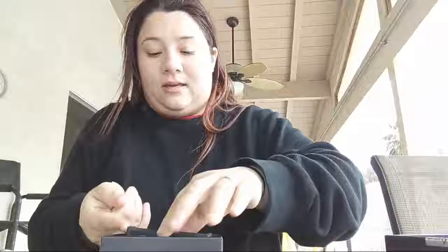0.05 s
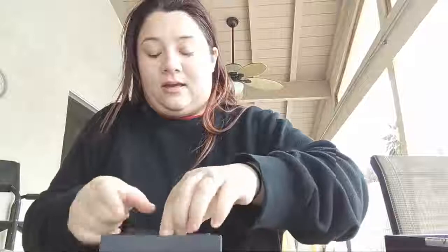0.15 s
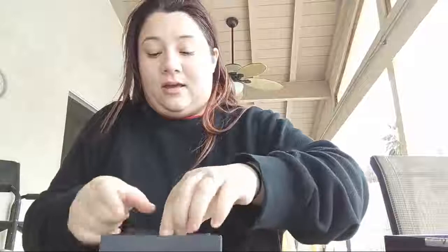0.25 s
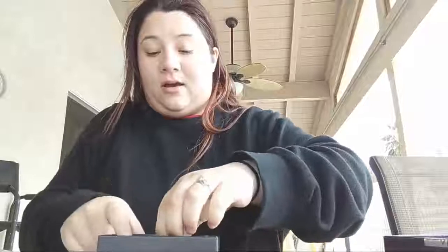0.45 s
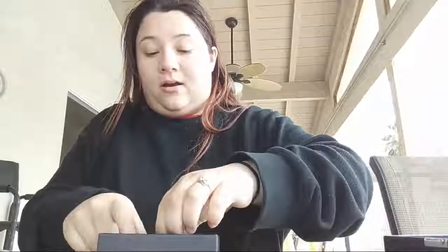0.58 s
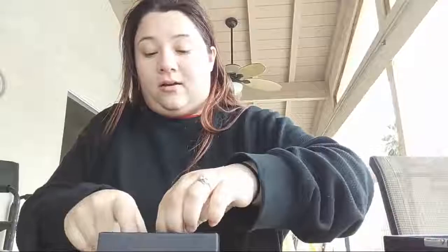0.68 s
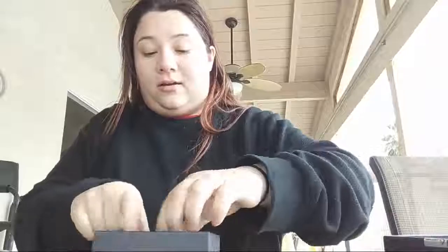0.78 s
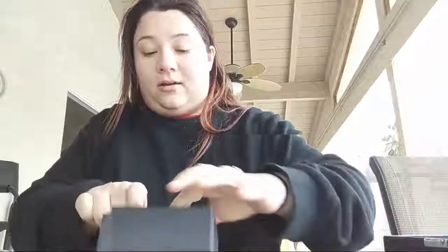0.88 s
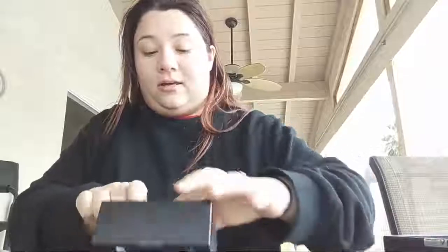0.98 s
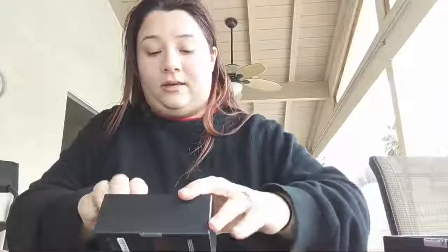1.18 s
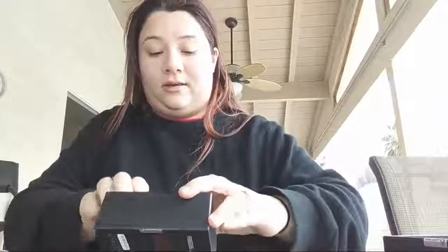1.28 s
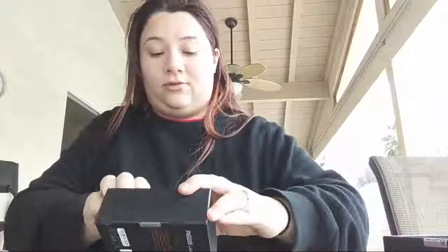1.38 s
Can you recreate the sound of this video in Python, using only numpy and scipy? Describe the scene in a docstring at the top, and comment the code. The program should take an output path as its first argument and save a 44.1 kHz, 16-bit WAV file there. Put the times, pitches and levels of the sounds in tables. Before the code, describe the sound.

Small stiff box handled by fingers, close up: a bright snap and cluster of ticks early, a near-quiet gap with one faint bird chirp, then light knocks and scraping over steady distant wash and hiss.

```python
"""A far traffic-like wash with microphone hiss comes first: band-shaped noise, steady throughout.
Fingers then work at the lid of a small cardboard box on a patio table, close to a laptop-style microphone.
A nail snaps off the lid edge and the lid rattles back; later the box is knocked, slid and lifted.
Contacts are short pushes into ringing modes; rubbing is random grains, sliding is resonant noise.
Dry nail ticks are noise bursts; one faint bird chirp is a rising sine."""
import sys
import numpy as np
from scipy import signal
from scipy.io import wavfile

SR = 44100
rng = np.random.default_rng(int(sys.argv[2]) if len(sys.argv) > 2 else 0)


def elevation(decibels):
    """Turn decibel levels (scalar or array-like) into linear amplitude ratios."""
    levels = np.asarray(decibels, float)
    return 10 ** (levels / 20)


def wav_record(signal):
    """Record a signal, one row per channel, as 16-bit PCM in the file named by sys.argv[1]."""
    frames = np.transpose(np.atleast_2d(signal))
    bounded = np.clip(frames, -1, 1)
    # unit amplitude maps onto the largest positive 16-bit level
    quanta = np.round(bounded * 32767).astype(np.int16)
    wavfile.write(sys.argv[1], SR, quanta)


N = 63945

# light nail and finger contacts on the box: (time [s], level before the modes [dB], contact length [ms])
LIGHT_TAPS = [(0.1665, -53, .6), (0.1833, -51, .16), (0.2450, -44, .5), (0.2585, -38, .4),
              (0.2622, -32, .35), (0.2665, -39, .6), (0.2712, -37, .6), (0.2840, -35, .1),
              (0.2886, -36, .45), (0.2920, -40, .3), (0.3200, -46, .3), (0.3228, -40, 1.1),
              (0.3258, -43, 1.1), (0.3289, -38, 1.5), (0.3430, -48, .6), (0.3555, -49, .2),
              (0.9135, -44, .3), (0.9158, -38.5, .16), (0.9179, -33, 1.3), (0.9640, -41, 2.0),
              (0.9705, -46, .4), (1.1830, -47, .5), (1.4240, -53, .5)]
# box and table modes: (frequency [Hz], relative level [dB], t60 [s])
BOX_MODES = [(119, -32, 0.23), (389, -19, 0.032), (254, -28, .3), (606, -5, .033), (696, -1, .025),
             (991, -6, .013), (1219, -3, .020), (1880, -5, .008), (2045, -19, 0.024), (3230, -3.5, 0.0054),
             (3910, -0.5, 0.0063), (5140, -6.5, 0.013), (5800, -26, 0.0053), (6585, 6, 0.012),
             (7100, -4.5, 0.021), (8600, -26, .006), (10600, -29, .006)]
# dry nail ticks that miss the box body: (time [s], level before the high-pass [dB])
NAIL_TICKS = [(0.1830, -60), (0.2490, -50), (0.9160, -56), (0.2975, -58), (0.3000, -52)]
# fingers and box rubbing: (time [s], level [dB], tilt about 1 kHz [dB/octave])
RUB_STROKES = [(0, -78.5, 5.3), (0.238, -57.5, -0.1), (0.253, -40, -0.5), (0.273, -48, 1), (0.30, -51.5, 2),
               (0.311, -42, -3), (0.335, -53.5, -1), (0.37, -63.5, 0.7), (0.6, -100, -11.7),
               (0.8, -65, 2.2), (0.871, -58, -3.5), (0.907, -55.5, 4), (0.928, -51, 0.3),
               (0.982, -58, -0.5), (1.032, -53.5, 0.1), (1.07, -54, -1.3), (1.12, -59.5, -3.3),
               (1.18, -62, -0.7), (1.25, -56.5, -2.3), (1.33, -66, -0.5), (1.425, -84, -9.5),
               (1.44, -52, 2), (1.45, -73, 8.5)]
# cardboard colour of the rub: (frequency [Hz], relative band level [dB])
CARDBOARD_COLOUR = [(30, -48), (90, -28.5), (150, -21), (255, -4.5), (420, -7), (700, 1.5), (1200, -1.5),
                    (1500, -9), (2300, -10), (3000, -12.5), (4000, -15), (5500, -24), (6500, -24.5),
                    (8000, -27), (11000, -29.5), (16000, -44)]
# skin and nail sliding along the smooth lid: (time [s], level [dB])
SLIDE_LEVEL = [(0, -85), (0.95, -80), (0.99, -67), (1.03, -61), (1.08, -63), (1.12, -67), (1.17, -69),
               (1.24, -67), (1.29, -76), (1.41, -80), (1.428, -66), (1.434, -68), (1.442, -59), (1.45, -56)]
# panel resonances sung by the slide: (frequency [Hz], bandwidth [Hz], relative level [dB])
SLIDE_RESONANCES = [(2150, 300, -1), (2600, 350, -2), (3950, 450, -7), (6400, 500, -15), (8300, 600, -21)]
# bird chirp: (start [s], length [s], from [Hz], to [Hz], peak level [dB])
BIRD_CHIRP = (0.540, .046, 3250, 3900, -72)
# colour of the steady background: (frequency [Hz], relative band level [dB])
WASH_COLOUR = [(25, -41), (60, -21.5), (120, -15.5), (200, -8.5), (250, -2), (320, -5), (480, -4.5),
               (600, -1.5), (800, -1.5), (1150, -2.5), (1400, -13.5), (2000, -14.5), (2600, -18),
               (3700, -18), (5000, -25.5), (6300, -30), (7800, -33), (10000, -29.5), (16000, -30.5)]


def rms_one(x):
    """Scale to rms 1."""
    return x / np.sqrt(np.mean(x ** 2) + 1e-20)


def drift(rate_hz):
    """Slow random curve of rms 1: white noise through two equal one-pole low-passes."""
    pole = np.exp(-2 * np.pi * rate_hz / SR)
    noise = rng.standard_normal(N + SR)
    slow = signal.lfilter([1], [1, -2 * pole, pole * pole], noise)
    return rms_one(slow[SR:])  # first second settles the filter


def ring(force, hz, t60_s):
    """Damped resonator: a unit click sets a sine of height 1 ringing."""
    radius = elevation(-60 / (t60_s * SR))
    angle = 2 * np.pi * hz / SR
    feedback = [1, -2 * radius * np.cos(angle), radius * radius]
    return signal.lfilter([0, np.sin(angle)], feedback, force + 1e-18)


def colour_bands(sources, colour, patchy_db, tilt_db_per_octave=0):
    """Quarter-octave bands from two alternating sources, with level, tilt and one of five flickers."""
    colour_hz, colour_db = np.transpose(colour)
    edges_hz = 22 * 2 ** np.arange(0, 9.7, 0.25)
    flickers = [drift(15) for _ in range(5)]
    out = 0
    for k, (low_hz, high_hz) in enumerate(zip(edges_hz, edges_hz[1:])):
        mid_hz = np.sqrt(low_hz * high_hz)
        level_db = np.interp(np.log(mid_hz), np.log(colour_hz), colour_db)
        level_db = level_db + tilt_db_per_octave * np.log2(mid_hz / 1000)
        band_pass = signal.butter(2, [low_hz, high_hz], "band", fs=SR, output="sos")
        twice = np.tile(sources[k % 2], 2)
        band = signal.sosfilt(band_pass, twice)[N:]  # first pass settles the filter
        out = out + elevation(level_db + patchy_db * flickers[k % 5]) * band
    return out


def strike(time_s, level_db, contact_ms, spread_db):
    """Unit-area half-sine push of the contact's length into all box modes."""
    opposed_above_hz = 850  # higher modes start the other way
    phase = np.clip((np.arange(N) / SR - time_s) * 1000 / contact_ms, 0, 1)
    push = np.sin(np.pi * phase) * np.pi / 2 * 1000 / (contact_ms * SR)
    start = int(time_s * SR)
    force = push[start:start + SR // 2]
    out = np.zeros(N)
    for (hz, mode_db, t60_s), own_db in zip(BOX_MODES, spread_db):
        gain = np.sign(opposed_above_hz - hz) * elevation(level_db + mode_db + own_db)
        out[start:start + len(force)] += gain * ring(force, hz, t60_s)
    return out


def lid_snap():
    """The nail catches the lid edge, then lets go with the opposite push."""
    even = np.zeros(len(BOX_MODES))
    catch = strike(0.24888, -20, 0.25, even)
    release = strike(0.24920, -16.3, 0.44, even)
    return catch - release


def light_taps():
    """Light contacts, each with its own mode balance; they hardly reach the top modes."""
    spread_db, cut_hz = 3, 4300
    spread = spread_db * rng.standard_normal((len(LIGHT_TAPS), len(BOX_MODES)))
    contacts = sum(strike(*tap, own) for tap, own in zip(LIGHT_TAPS, spread))
    return signal.sosfilt(signal.butter(4, cut_hz, fs=SR, output="sos"), contacts)


def struck_box():
    """Snap and taps through a bass cut: a small box radiates little bass."""
    bass_cut_hz = 200
    high_pass = signal.butter(2, bass_cut_hz, "high", fs=SR, output="sos")
    return signal.sosfilt(high_pass, lid_snap() + light_taps())


def nail_ticks():
    """Tiny bright noise bursts with exponential decay, high-passed."""
    low_hz, decay_ms = 7100, 0.97
    t = np.arange(200) / SR
    decay = np.exp(-t * 1000 / decay_ms)
    noises = rng.standard_normal((len(NAIL_TICKS), len(t)))
    out = np.zeros(N)
    for (time_s, level_db), noise in zip(NAIL_TICKS, noises):
        out[int(time_s * SR):][:len(t)] += elevation(level_db) * noise * decay
    return signal.sosfilt(signal.butter(4, low_hz, "high", fs=SR, output="sos"), out)


def rub():
    """Dense uneven fibre slips coloured by the cardboard, juddering under the stroke."""
    grains_per_s, grain_db, judder_db = 7000, 2.5, 1.5
    time_s, level_db, tilt = np.transpose(RUB_STROKES)
    t = np.arange(N) / SR
    slips = (rng.random((2, N)) < grains_per_s / SR) * rng.choice([-1, 1], (2, N))
    unevenness = np.minimum(rng.exponential(1, (2, N)), 5)
    grains = slips * elevation(grain_db * unevenness)
    sound = colour_bands(grains / np.std(grains), CARDBOARD_COLOUR, 1.96, np.interp(t, time_s, tilt))
    stroke_db = np.interp(t, time_s, level_db) + judder_db * drift(60)
    return elevation(stroke_db) * rms_one(sound)


def slide():
    """Smooth friction noise singing in a few panel resonances, each wavering in level."""
    waver_db = 2.5
    noises = rng.standard_normal((len(SLIDE_RESONANCES), N))
    singing = 0
    for (hz, width_hz, level_db), noise in zip(SLIDE_RESONANCES, noises):
        t60_s = np.log(1000) / (np.pi * width_hz)
        gain = elevation(level_db + waver_db * drift(20))
        singing = singing + gain * rms_one(ring(noise, hz, t60_s))
    level = elevation(np.interp(np.arange(N) / SR, *np.transpose(SLIDE_LEVEL)))
    return level * rms_one(singing)


def bird():
    """One rising whistle: a gliding sine under a half-sine swell."""
    start_s, length_s, from_hz, to_hz, peak_db = BIRD_CHIRP
    progress = np.clip((np.arange(N) / SR - start_s) / length_s, 0, 1)
    pitch_hz = from_hz + (to_hz - from_hz) * progress ** 1.3
    whistle = np.sin(2 * np.pi * np.cumsum(pitch_hz) / SR)
    return elevation(peak_db) * np.sin(np.pi * progress) * whistle


def wash():
    """Far traffic-like wash and microphone hiss as one band-shaped, slightly patchy noise."""
    level_db = -60.5
    noise = rng.standard_normal((2, N))
    return elevation(level_db) * rms_one(colour_bands(noise, WASH_COLOUR, 1.5))


def scene():
    """Box sounds over the outdoor background, one channel."""
    mix = struck_box() + nail_ticks() + rub() + slide() + bird() + wash()
    return mix[None]


def band_limit(x):
    """A steep low-pass at the top of the band."""
    return signal.sosfilt(signal.butter(12, 16430, fs=SR, output="sos"), x)


def record(dry):
    """A steep low-pass cuts the top."""
    cutoff_hz = 16500
    low_pass = signal.cheby2(12, 60, cutoff_hz, fs=SR, output="sos")
    finished = signal.sosfilt(low_pass, dry)
    return band_limit(finished)


dry = scene()
out = record(dry)
wav_record(out)
```